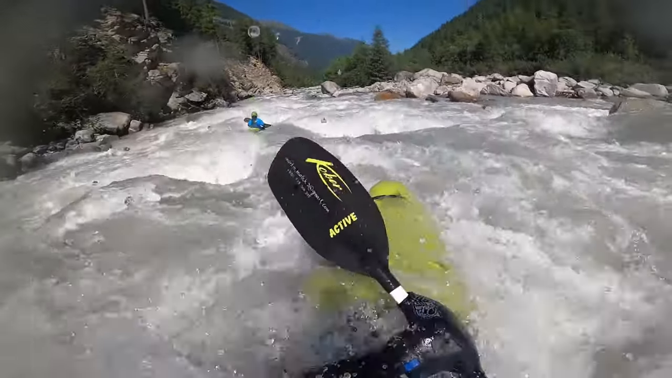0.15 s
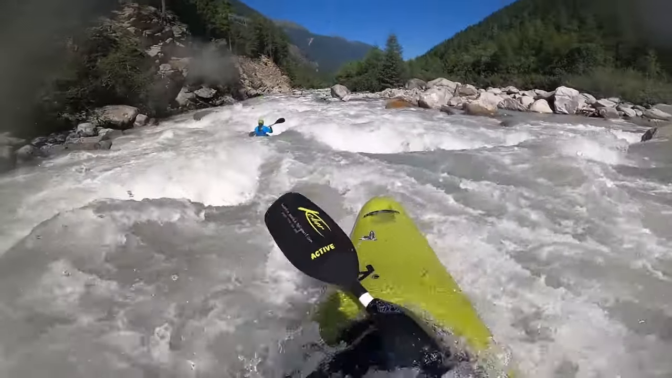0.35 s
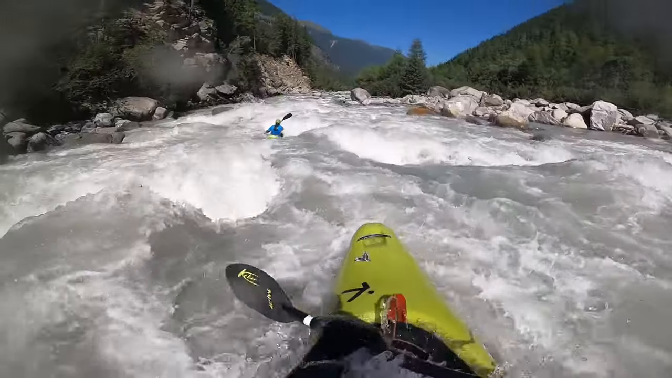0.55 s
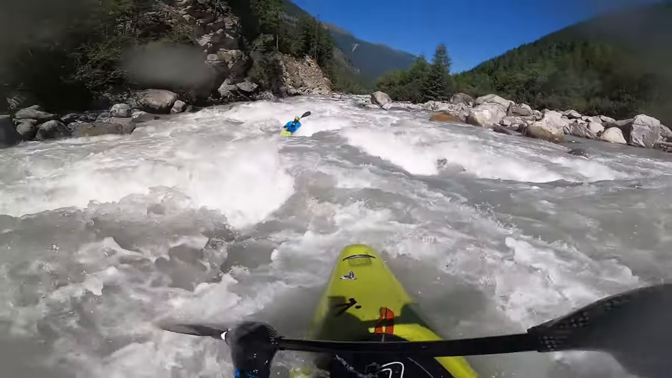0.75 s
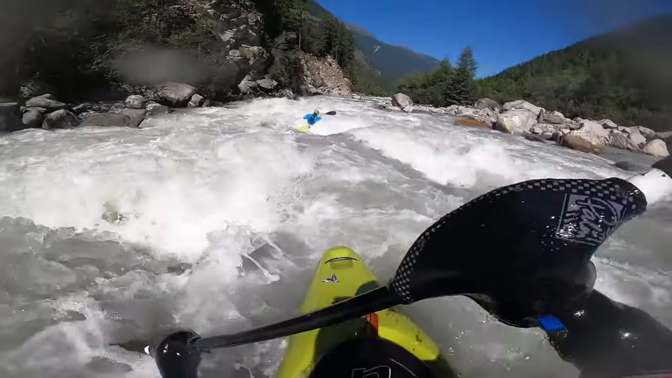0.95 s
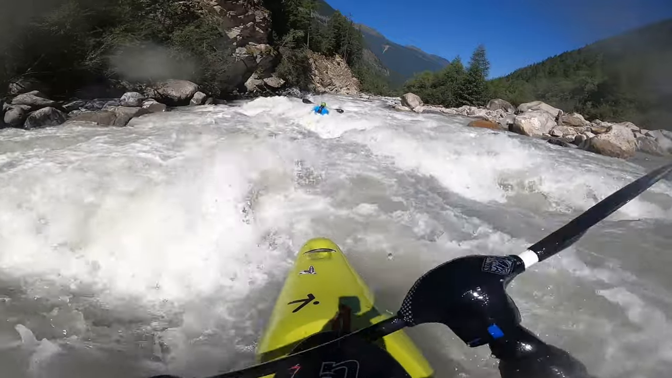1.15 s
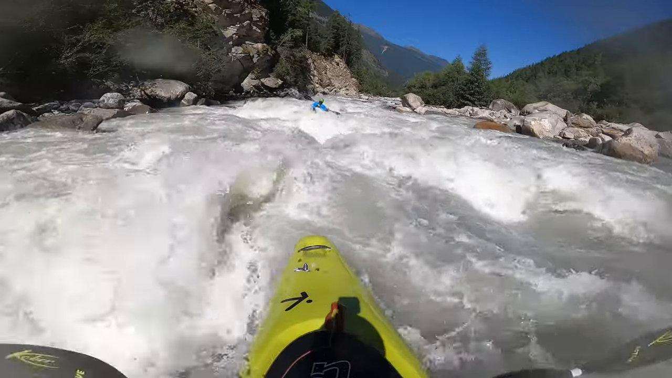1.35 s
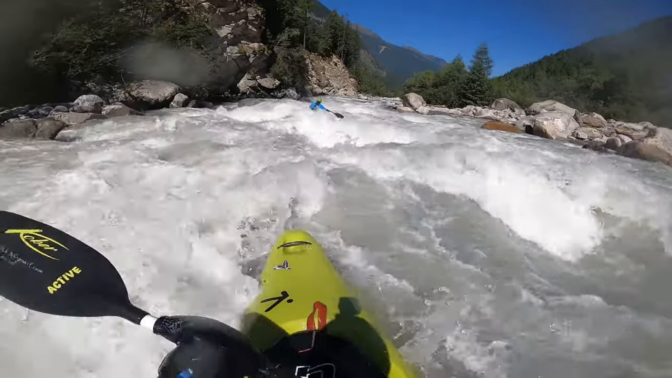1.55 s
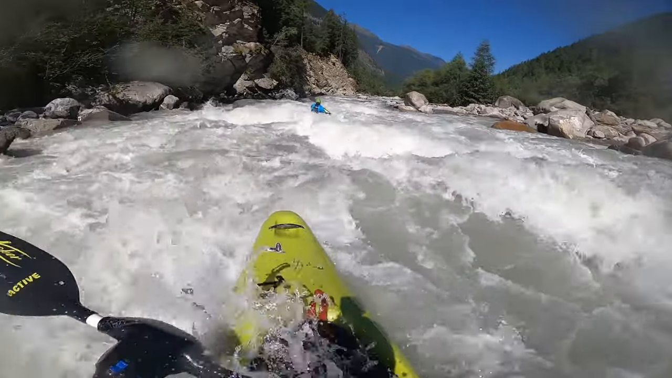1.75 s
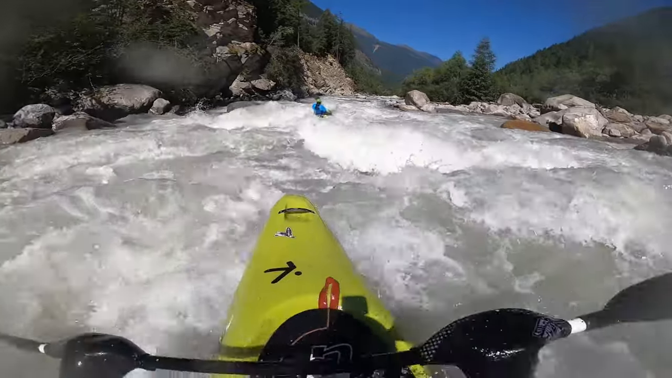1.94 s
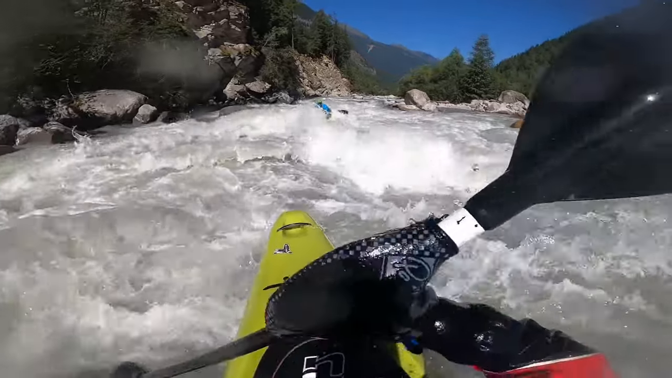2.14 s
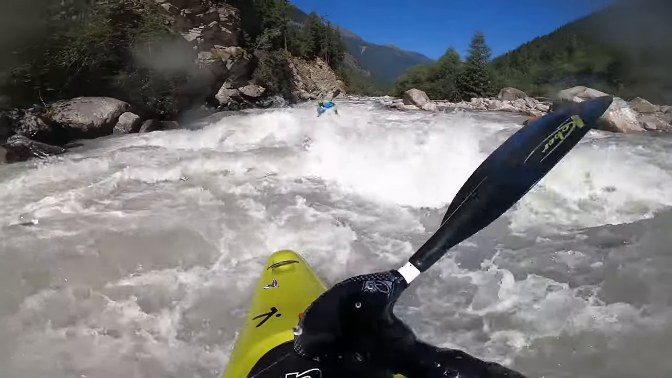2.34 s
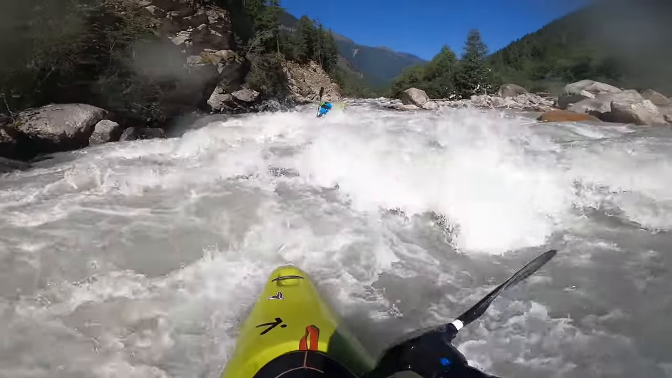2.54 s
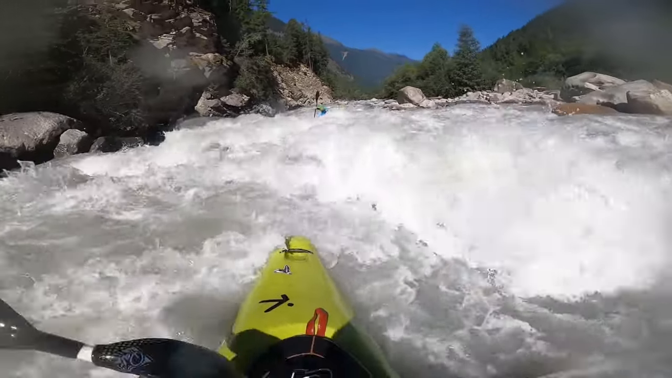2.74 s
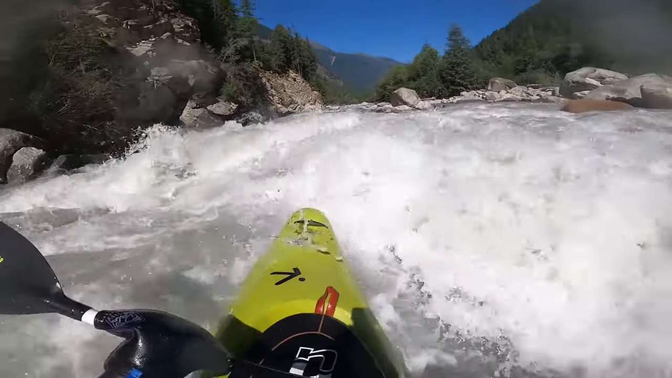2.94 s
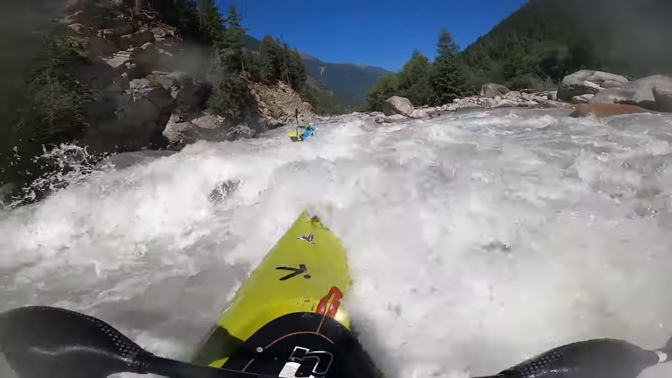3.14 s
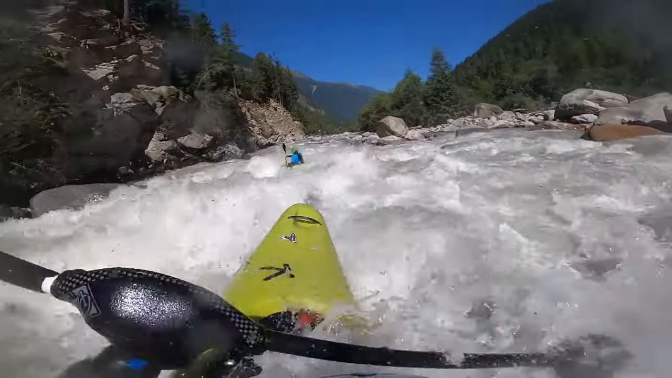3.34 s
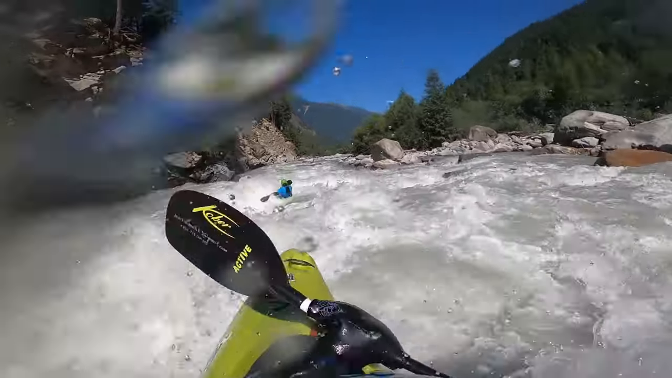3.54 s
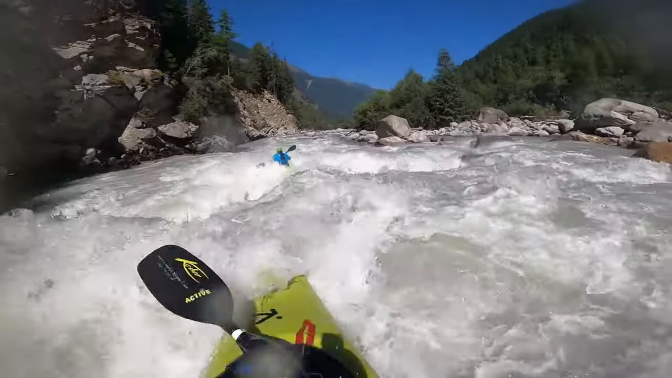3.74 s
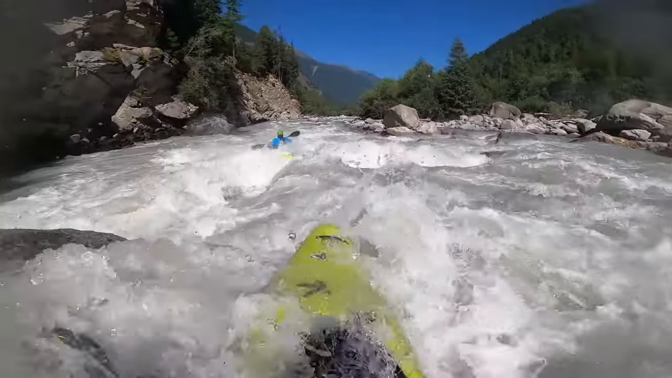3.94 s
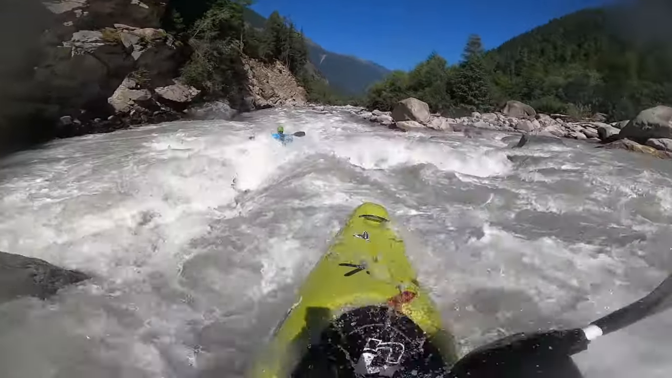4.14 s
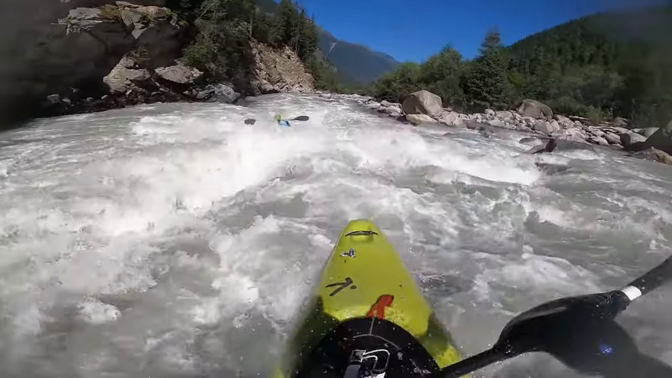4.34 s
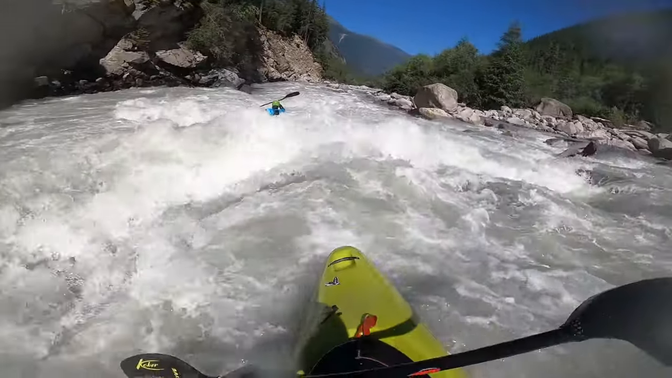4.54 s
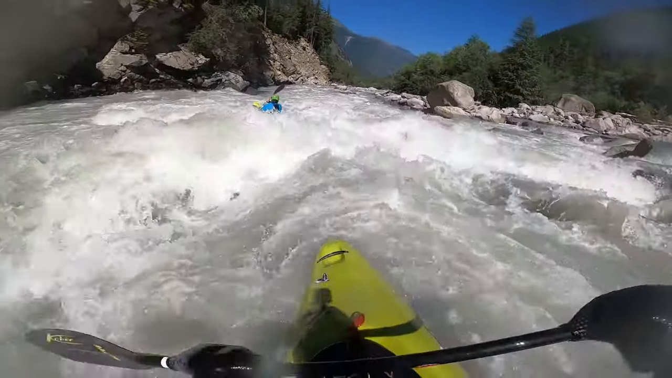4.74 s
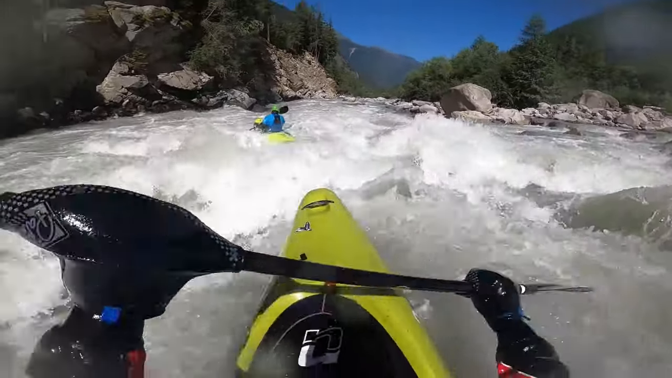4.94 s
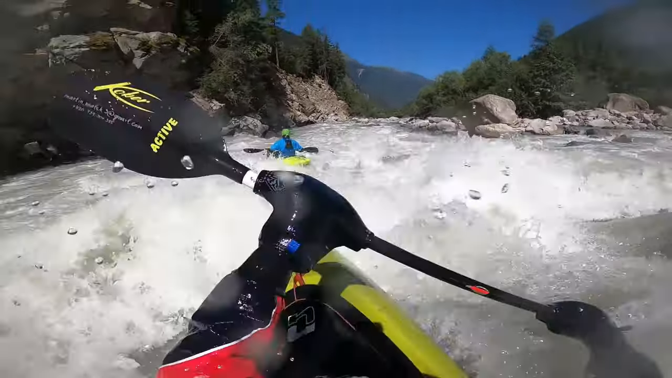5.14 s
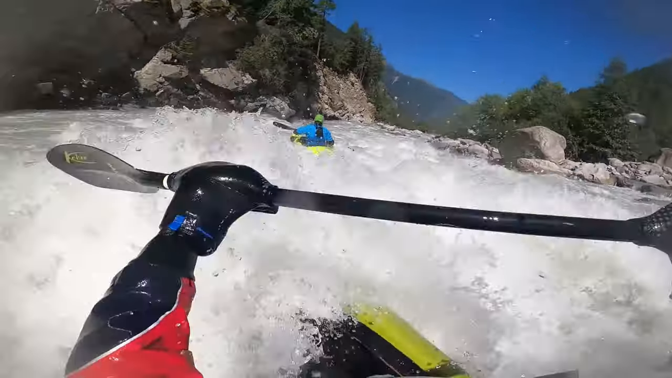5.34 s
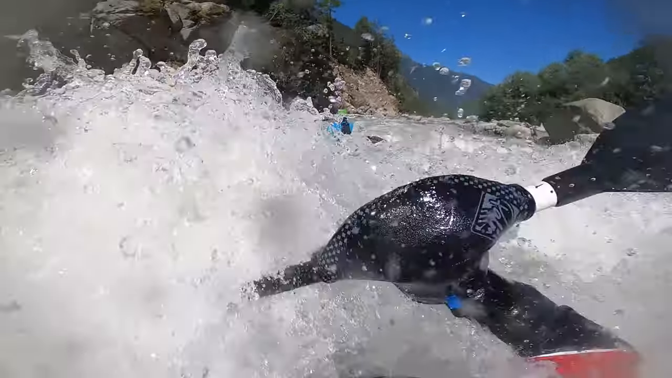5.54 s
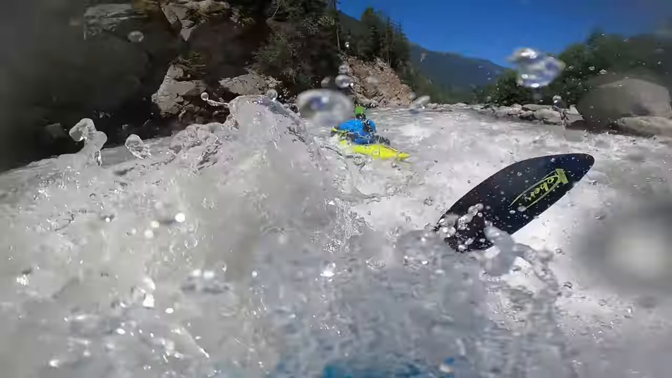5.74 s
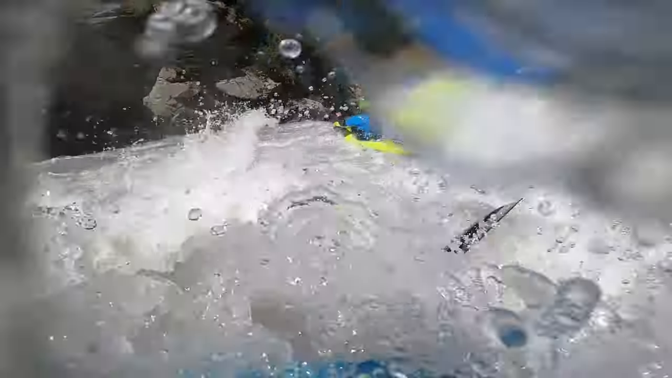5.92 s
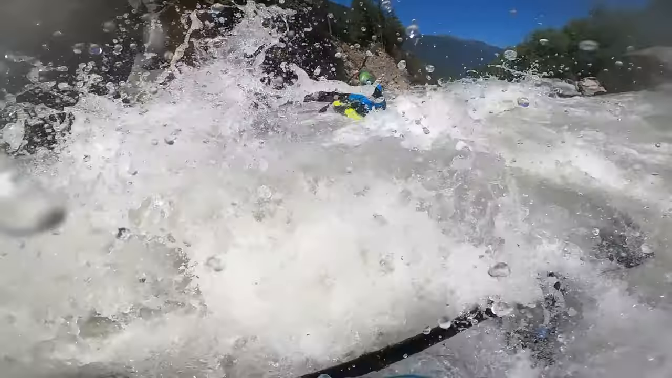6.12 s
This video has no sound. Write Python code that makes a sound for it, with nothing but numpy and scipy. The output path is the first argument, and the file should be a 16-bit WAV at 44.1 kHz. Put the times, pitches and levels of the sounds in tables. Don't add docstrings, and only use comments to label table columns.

```python
import sys
import numpy as np
from scipy import signal
from scipy.io import wavfile
from scipy.ndimage import uniform_filter1d

SR = 44100
rng = np.random.default_rng(int(sys.argv[2]) if len(sys.argv) > 2 else 0)


def master_out(mix):
    frames = np.transpose(np.atleast_2d(mix))
    ceiling = np.clip(frames, -1, 1)
    pcm = np.round(ceiling * 32767).astype(np.int16)
    wavfile.write(sys.argv[1], SR, pcm)


def to_linear_factor(level_db):
    exponent = np.asarray(level_db, float) / 20
    return 10 ** exponent


N = 272538

# [t/s, nearby breaking foam level/dB, heavy swell under the hull level/dB]
RIVER_LEVELS = [(0.0, -23.5, -35), (0.2, -31, -33.5), (0.35, -33, -35), (0.7, -29.5, -35),
                (1.1, -30.5, -32.5), (1.5, -25.5, -31), (1.75, -25.5, -32), (2.0, -28, -31.5),
                (2.7, -29.5, -33), (3.25, -25, -32.5), (3.42, -24, -31.5), (3.6, -30, -35),
                (4.3, -30, -35.5), (4.8, -27, -33), (5.16, -27, -33), (5.45, -30, -34), (5.8, -31, -27),
                (6.18, -34, -31)]
# [f/Hz, level/dB per Hz]
ROAR_COLOUR = [(60, -14), (150, 1), (300, -3.5), (550, -3.7), (1200, -9.5), (2200, -13.5), (3500, -17),
               (5500, -19), (7500, -29), (8700, -36.5), (10000, -37.5), (12000, -32), (15000, -29)]
# [f/Hz, width/Hz, level/dB]
CAVITY = [(760, 278, -9.5), (1152, 150, 18.2), (1500, 200, -5), (1710, 150, 4.5), (2000, 200, -1.5),
          (2820, 45, -4), (3200, 360, 3.5), (3785, 264, -6), (4300, 620, 4.5), (4920, 270, -4.5),
          (5210, 180, 5.5), (6500, 400, -3), (7300, 700, 4), (8280, 1200, -4), (9980, 1200, 7),
          (11000, 300, -4.5), (11500, 600, 3.5), (13200, 840, 0)]
# [t/s, muffling/dB, drain time/s]
WATER_FILMS = [
    (5.19, 22.5, 0.097),
    (5.62, 11, 0.031),
    (5.646, 7.5, 0.046),
    (5.824, 10, 0.028),
    (5.995, 2, 0.036),
    (6.058, 1, 0.027),
]
# [t/s, peak level/dB, rise/s per 10 dB, fall/s per 10 dB]
WIND_GUSTS = [(0.15, -19.5, .3, .12), (0.29, -19, .1, .05), (0.4, -25, .08, .05), (0.62, -30, .12, .25),
              (0.93, -33, .05, .06), (1.1, -21, .06, .08), (1.25, -30, .1, .2), (1.45, -30, .05, .06),
              (1.8, -28.5, .2, .04), (2.05, -30, .2, .1), (2.2, -24.5, .04, .25), (2.41, -24, .05, .1),
              (2.88, -25, .04, .4), (3.01, -26, .1, .12), (3.24, -27, .05, .1), (3.34, -17, .04, .055),
              (3.47, -12, .03, .14), (3.6, -16, .1, .025), (3.68, -20.5, .05, .1), (3.87, -23.5, .07, .28),
              (4.18, -19.5, .055, .04), (4.27, -24, .06, .2), (4.8, -21.5, .3, .5), (5.08, -14.5, .1, .1),
              (5.23, -15.5, .1, .12), (5.47, -14, .15, .04), (5.56, -16, .04, .15),
              (5.66, -10.5, .12, .085), (5.85, -14, .13, .18), (6.06, -18, .08, .06)]
# [t/s, peak level/dB, rise/s per 10 dB, fall/s per 10 dB]
HULL_THUMPS = [(0.0, -23, .01, .012), (0.1, -17.5, .022, .075), (0.9, -40, .8, .3), (1.45, -35, .35, .15),
               (1.93, -36, .6, .15), (2.08, -29, .1, .12), (2.34, -38, .08, .25), (2.65, -37, .13, .5),
               (3.18, -35, .07, .4), (3.44, -31, .07, .13), (4.27, -34, .25, .09), (4.51, -33, .12, .06),
               (4.99, -37, .35, .3), (5.18, -24.5, .05, .07), (5.29, -23, .06, .04), (5.42, -27, .15, .03),
               (5.58, -21, .045, .2), (5.82, -15, .15, .04), (6.05, -23, .35, .04), (6.17, -30, .3, .1)]
# [t/s, crackle level/dB, rise/s per 10 dB, fall/s per 10 dB, fine spray level/dB]
WATER_SHEETS = [(5.35, -44, .012, .04, 7), (5.49, -51, .1, .1, -6), (5.55, -43, .06, .04, 3),
                (5.61, -42, .03, .008, -3), (5.67, -47, .015, .06, -3), (5.74, -35, .01, .05, -6),
                (5.79, -29, .022, .022, -1), (5.82, -38, .03, .007, 2), (5.925, -39, .03, .05, 1),
                (5.967, -42, .04, .012, 8), (6.13, -49, .03, .07, 1)]
# [t/s, peak level/dB, pocket f/Hz, spatter time/s]
AIR_POCKETS = [(.092, -5, 628, .0035), (.093, -8, 470, .003), (.097, -18, 119, .016),
               (3.672, -19, 2520, .004), (3.671, -19.5, 3900, .004), (4.121, -23, 2970, .003),
               (5.175, -20, 1210, .0053), (5.18, -14, 2350, .0059), (5.187, -7, 2600, .0025),
               (5.187, -8, 1600, .003), (5.191, -3.5, 140, .010), (5.262, -4.5, 74, .012),
               (5.611, -3, 485, .005), (5.726, -17, 4300, .0033), (5.742, -7, 160, .01),
               (5.85, -17, 1360, .0022), (5.912, -9, 380, .006), (6.05, -9, 700, .003),
               (5.895, -23, 1140, .01), (5.972, -13, 700, .006), (6.034, -9.5, 150, .007),
               (6.135, -15, 700, .006), (6.054, -14.5, 1420, .0026)]
# [t/s, peak level/dB, pocket f/Hz, crack level/dB]
HEAVY_SLAPS = [(1.293, -22, 1180, -13), (2.989, -18.5, 1080, -15), (4.121, -21, 1580, 0),
               (4.809, -20.5, 1200, -18), (4.919, -22, 1140, -11), (5.187, -10, 1144, 5),
               (5.409, -23.5, 1690, -10), (5.603, -15, 2876, 3), (5.613, -10.5, 1300, 4),
               (5.641, -1, 330, -18), (5.641, -7, 760, -7), (5.661, -22, 2920, 5), (5.726, -14.5, 1320, 8),
               (5.742, -7, 1800, -3), (5.752, -18, 1250, -9), (5.769, -12, 2900, -5), (5.784, -10, 3050, 1),
               (5.797, -5, 540, -1), (5.87, -21, 3500, -5), (5.912, -1.5, 590, -13), (5.946, -10, 675, -4),
               (6.052, -7, 560, -3), (6.092, -26, 1780, -3)]
# [t/s, peak level/dB, pocket f/Hz, crack level/dB]
SPRAY_SPLATS = [(0.749, -28, 4180, -10), (5.186, 0, 480, -6), (5.345, -14, 450, -3),
                (5.508, -4.5, 613, -11), (5.519, -12, 2500, 0), (5.526, -5, 480, -18),
                (5.569, -13, 2900, 2), (5.547, -4, 600, 2), (5.812, -12, 2800, -17),
                (5.847, -26, 5570, -17), (5.926, -16, 2900, -1), (5.964, -21, 3030, 5),
                (5.985, -32, 7000, 11), (6.106, -44, 9500, 14), (6.117, -29, 4500, 8),
                (6.131, -20, 1780, -3), (6.14, -14, 500, -14), (6.155, -36, 5600, 16),
                (6.167, -17, 2700, -10)]

MEAN_FOAM_DB, MEAN_SWELL_DB = -28.5, -34
ROAR_FOLLOWS, SPRAY_FOLLOWS, CREST_FOLLOWS = 0.7, 1.05, 1.2
SPRAY_DB, CREST_DB = -17.5, -11
ROAR_SWELL = 0.3
WAVE_S, WAVE_RISE_S, WAVE_SPRAY_DB, WAVE_CREST_DB = 5.5, 0.2, -9, 6
POCKET_CRACK_DB, POCKET_FINE_DB = -30, -45
SLAP_S, SLAP_FINE_DB = .003, -27
SPLAT_S, SPLAT_FINE_DB = .0032, -5
MEMBRANE_HZ, MEMBRANE_WIDTH_HZ = 33.5, 6.2
LULL_DB, REST_DB = -50, -52


def rapid(roar_db, spray_db, surge_db, crest_db):
    out, swell, spit = 0, drift(4.4), drift(43)
    bubbles = grains(1500, spread_db=4.5)
    source = rng.standard_normal((2, N)) + to_linear_factor(-11) * bubbles
    edges = 50 * 2 ** (np.arange(26) / 3)
    hz_points, db_points = np.transpose(ROAR_COLOUR)
    parts_db = np.array([surge_db + 6.0, roar_db, crest_db + 9.5, spray_db + 18.0])
    part_hz = [400, 1200, 2400, 6000]
    for k, (low, high) in enumerate(zip(edges, edges[1:])):
        hz = np.sqrt(low * high)
        shares = [np.interp(np.log(hz), np.log(part_hz), one) for one in np.eye(4)]
        spit_share = np.clip(np.log2(hz / 1200), 0, 1)
        flicker_db = 0.27 * swell + .9 * spit * spit_share + .8 * drift(7.2)
        colour_db = np.interp(np.log(hz), np.log(hz_points), db_points)
        gain_db = colour_db + shares @ parts_db + flicker_db
        out = out + to_linear_factor(gain_db + 15.0) * band(source[k % 2], low, high)
    return out


def river_parts():
    foam_db, swell_db = in_time(RIVER_LEVELS)
    change = foam_db - MEAN_FOAM_DB
    wave = np.clip((np.arange(N) / SR - WAVE_S) / WAVE_RISE_S, 0, 1)
    spray_db = MEAN_FOAM_DB + SPRAY_DB + SPRAY_FOLLOWS * change + WAVE_SPRAY_DB * wave
    crest_db = MEAN_FOAM_DB + CREST_DB + CREST_FOLLOWS * change + WAVE_CREST_DB * wave
    swell_push_db = ROAR_SWELL * (swell_db - MEAN_SWELL_DB) * (1 - wave)
    roar_db = MEAN_FOAM_DB - 0.3 + ROAR_FOLLOWS * change + swell_push_db
    return roar_db, spray_db, swell_db, crest_db


def drops():
    length = 4096
    out, t = np.zeros(N + length), np.arange(length) / SR
    for s, peak_db, hz, spatter_s, crack_db, fine_db in strikes():
        noise = rng.standard_normal(length)
        spread = t / max(0.46 * spatter_s, 3e-4)
        swell = spread * np.exp(1 - spread)
        burst = noise * swell
        width_hz = 0.54 * hz / (1 + (hz / 1500) ** 1.65)
        rattle = resonance(resonance(burst, hz, width_hz), hz, 1.26 * width_hz)
        bubble = swell * np.sin(2 * np.pi * hz * t * (1 + 0.027 * spread))
        thud = bubble + 1.03 * rattle / np.abs(rattle).max()
        crack = band(band(band(burst, 600, 3500), 500, 3530), 300, 4100)
        fine = band(burst * swell ** 1.8, 3200, 19000)
        layers = [(0, thud), (crack_db, crack), (fine_db, fine)]
        hit = sum(to_linear_factor(db) * part / np.abs(part).max() for db, part in layers)
        at = int(s * SR)
        out[at:at + length] += to_linear_factor(peak_db - 5.0) * hit
    return out[:N]


def strikes():
    pockets = [(*row, POCKET_CRACK_DB, POCKET_FINE_DB) for row in AIR_POCKETS]
    slaps = [(s, db, hz, SLAP_S, crack, crack + SLAP_FINE_DB) for s, db, hz, crack in HEAVY_SLAPS]
    splats = [(s, db, hz, SPLAT_S, crack, crack + SPLAT_FINE_DB) for s, db, hz, crack in SPRAY_SPLATS]
    return pockets + slaps + splats


def wash():
    power = bursts(WATER_SHEETS) + 1e-30
    total = power.sum(axis=0)
    crackle_db = 10 * np.log10(total)
    fine_db = np.array(WATER_SHEETS)[:, -1] @ power / total
    pelt = grains(3500, spread_db=2.5) + 0.79 * rng.standard_normal(N)
    pelt = pelt * to_linear_factor(5.6 * drift(50))
    dealt, pops = rng.integers(0, 12, N), grains(900, spread_db=3.5)
    blobs = 0
    for k, hz in enumerate(np.geomspace(400, 4500, num=12)):
        blobs = blobs + resonance(pops * (dealt == k) + 1e-18, hz, 0.084 * hz)
    body = rms_one(band(band(pelt, 500, 4600), 300, 5500)) + to_linear_factor(-3.5) * rms_one(blobs)
    fine = band(band(pelt, 3200, 7500), 2500, 7500) + to_linear_factor(-9) * band(pelt, 9500, 14500)
    return to_linear_factor(crackle_db + 8.0) * (body + to_linear_factor(fine_db - 6.5) * rms_one(fine))


def film():
    t, lost_db = np.arange(N) / SR, np.zeros(N)
    for s, muffle_db, drain_s in WATER_FILMS:
        arrived = np.clip((t - s) / .004, 0, 1)
        drained = np.exp(-(np.maximum(t - s, 0) / drain_s) ** 1.3)
        lost_db = np.maximum(lost_db, muffle_db * arrived * drained)
    return lost_db


def housing(x):
    x = signal.sosfilt(signal.butter(2, 4000, fs=SR, output="sos"), x)
    for hz, width_hz, db in CAVITY:
        x = x + (to_linear_factor(db) - 1) * resonance(x, hz, width_hz / min(1, to_linear_factor(db)))
    return x


def wind():
    buffet_db, rumble_db = level_db(WIND_GUSTS, LULL_DB), level_db(HULL_THUMPS, REST_DB)
    air = rng.standard_normal((2, N + SR))
    shake = resonance(resonance(air[0], MEMBRANE_HZ, MEMBRANE_WIDTH_HZ), MEMBRANE_HZ, 27)
    heave = resonance(resonance(air[1], 20.2, 13), 19, 17)
    buffet = (rms_one(shake) + to_linear_factor(-6.5) * rms_one(heave))[SR:]
    rumble = band(band(air[1], 57, 132.5), 51, 154)[SR:]
    buffet = to_linear_factor(buffet_db) * evened(buffet, 0.12, 0.7)
    return buffet + to_linear_factor(rumble_db - 1.0) * evened(rumble, 0.066, .7)


def bursts(rows):
    t, powers = np.arange(N) / SR, []
    for s, db, rise_s, fall_s, *_ in rows:
        below_peak_db = 10 * np.maximum((s - t) / rise_s, (t - s) / fall_s)
        powers.append(to_linear_factor(2 * (db - below_peak_db)))
    return np.array(powers)


def level_db(rows, rest_db):
    return 10 * np.log10(bursts(rows).sum(axis=0) + to_linear_factor(2 * rest_db))


def grains(per_s, spread_db):
    sizes = to_linear_factor(spread_db * np.minimum(rng.exponential(1, N), 4)) * rng.choice([-1, 1], N)
    return rms_one(sizes * (rng.random(N) < per_s / SR))


def drift(rate):
    r = np.exp(-80 * np.pi * rate / SR)
    noise = rng.standard_normal(N // 40 + 2002)
    slow = signal.lfilter([1], [1, -2 * r, r * r], noise)[2000:]
    return np.interp(np.arange(N) / 40, np.arange(len(slow)), rms_one(slow))


def evened(x, span_s, share):
    level = np.sqrt(uniform_filter1d(rms_one(x) ** 2, max(int(span_s * SR), 2)) + 1e-3)
    return rms_one(x / level ** np.clip(share, 0, 1))


def resonance(x, hz, width_hz):
    r = np.exp(-np.pi * width_hz / SR)
    feedback = [1, -2 * r * np.cos(2 * np.pi * hz / SR), r * r]
    return signal.lfilter([(1 - r * r) / 2, 0, (r * r - 1) / 2], feedback, x)


def band(x, low_hz, high_hz):
    limits = [low_hz, min(high_hz, SR / 2 - 100)]
    return signal.sosfilt(signal.butter(2, limits, "band", fs=SR, output="sos"), x)


def in_time(rows):
    s, *columns = np.transpose(rows)
    return [np.interp(np.arange(N) / SR, s, c) for c in columns]


def rms_one(x):
    return x / np.sqrt(np.mean(x ** 2) + 1e-20)


def scene():
    river = rapid(*river_parts())
    lows = signal.lfilter([.04], [1, -.96], river)
    open_port = to_linear_factor(-film())
    highs = (river - lows) * (open_port + to_linear_factor(-32.5))
    outside = lows * open_port ** 1.2 + highs
    return (housing(outside + wash() + drops()) + wind())[None]


def top_cut(x):
    return signal.sosfilt(signal.butter(12, 15720, fs=SR, output="sos"), x)


def record(dry):
    mix = 1.1 * np.tanh(dry / 1.1)
    return top_cut(mix)


dry = scene()
out = record(dry)
master_out(out)
```